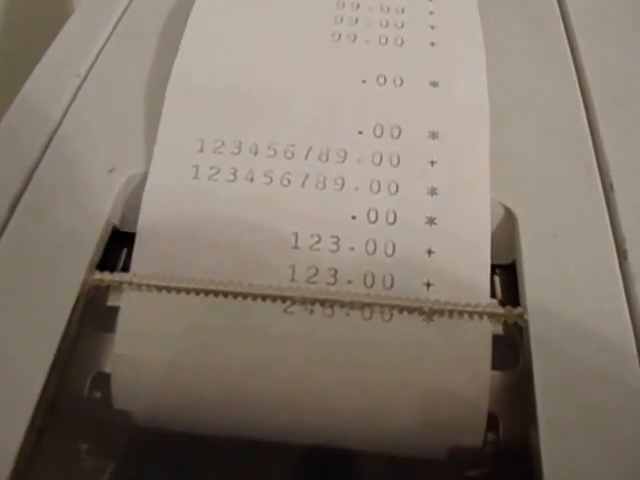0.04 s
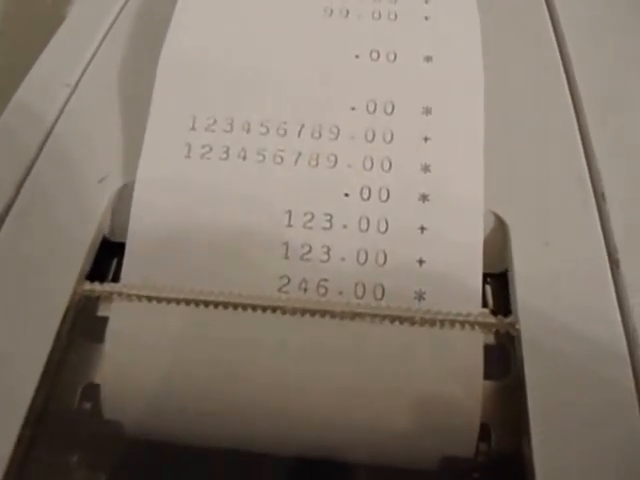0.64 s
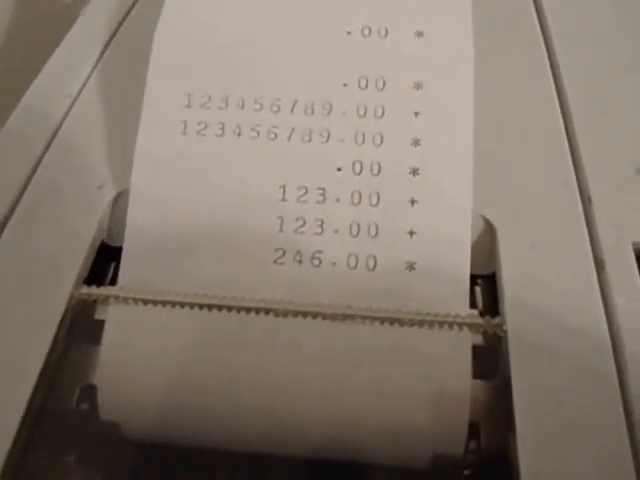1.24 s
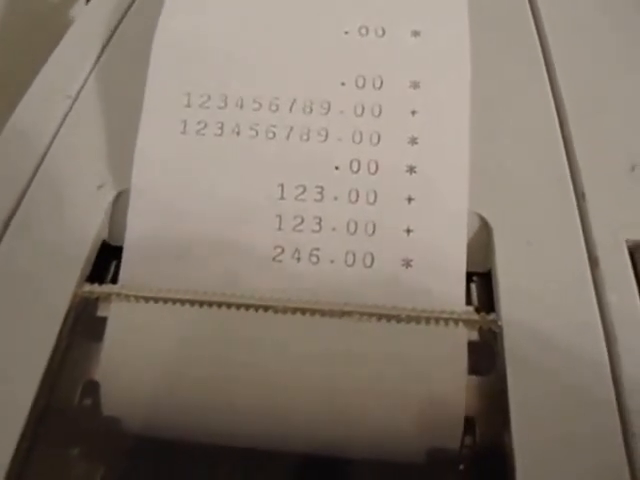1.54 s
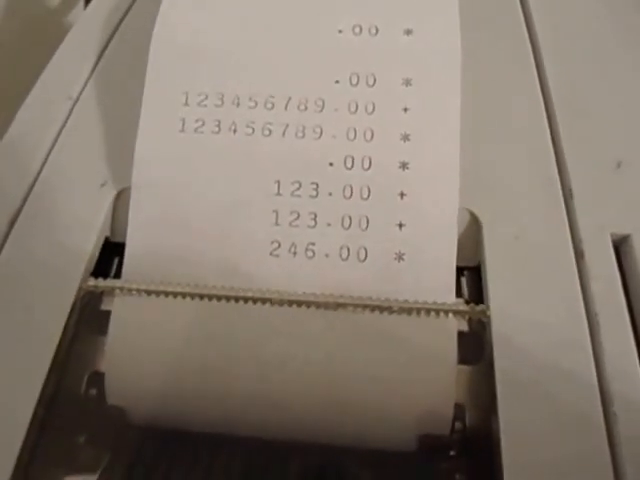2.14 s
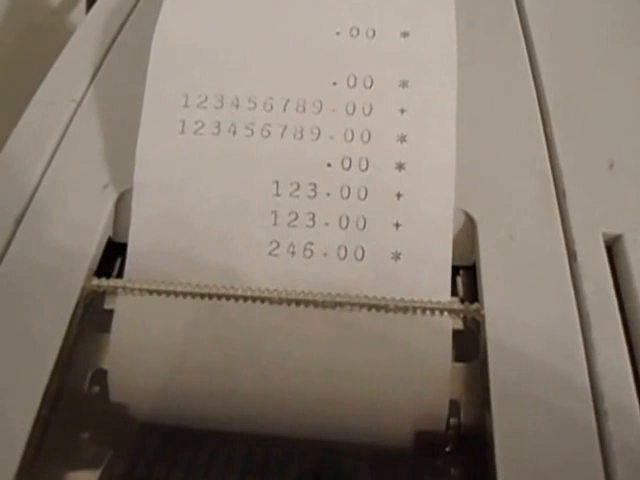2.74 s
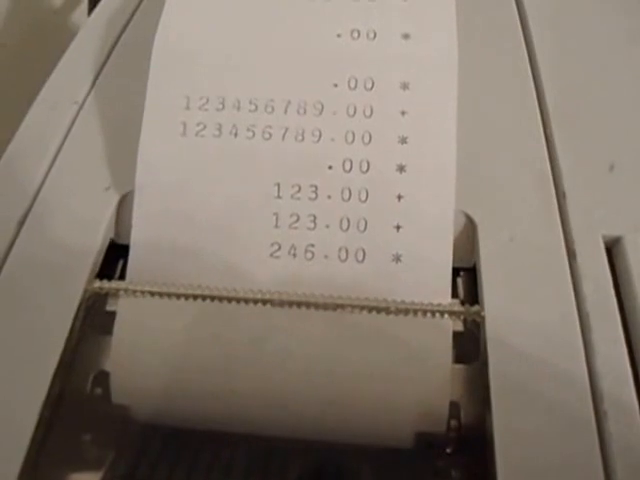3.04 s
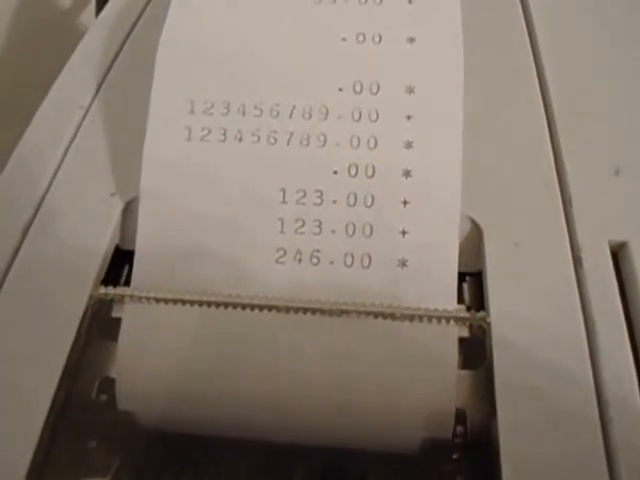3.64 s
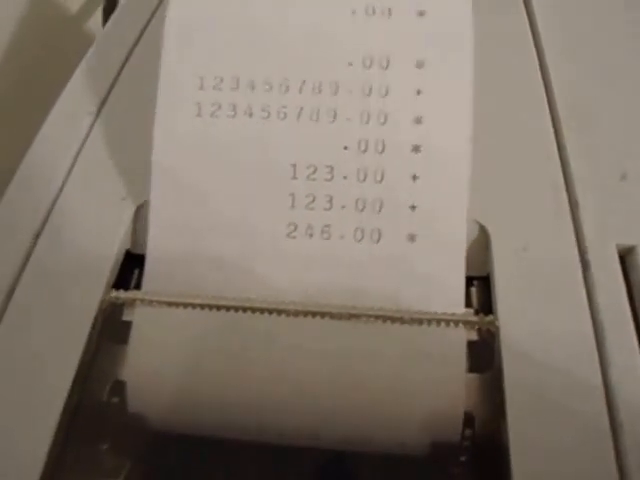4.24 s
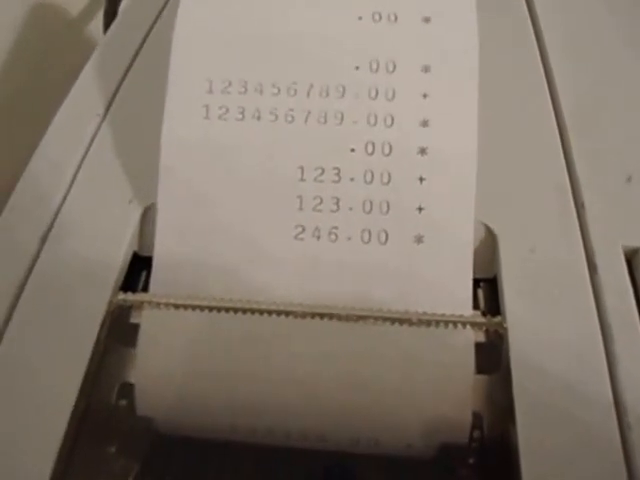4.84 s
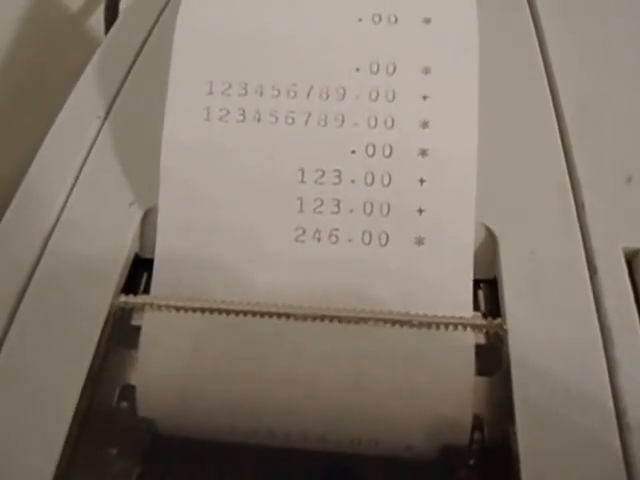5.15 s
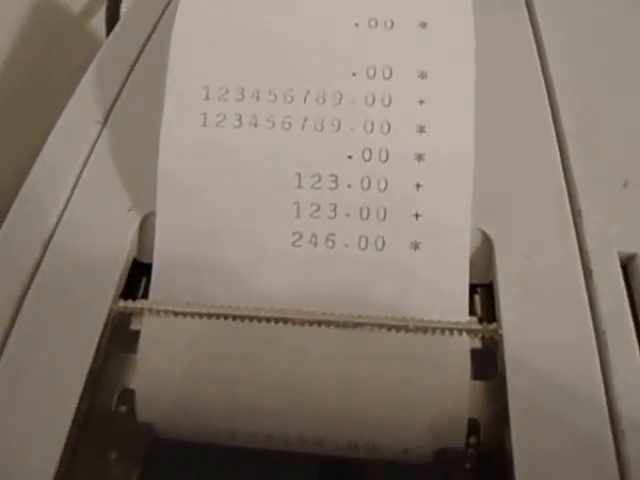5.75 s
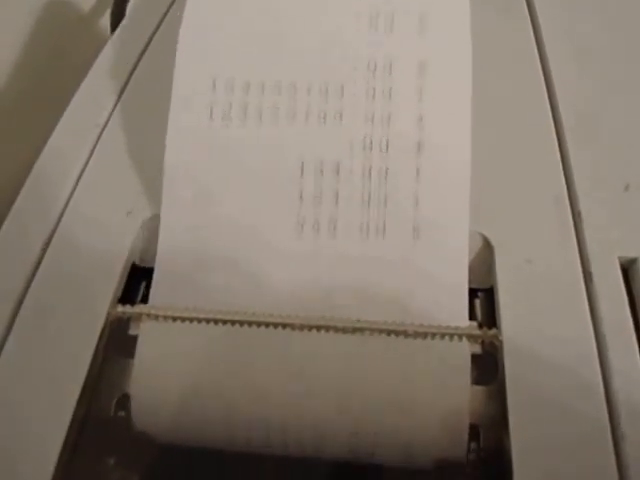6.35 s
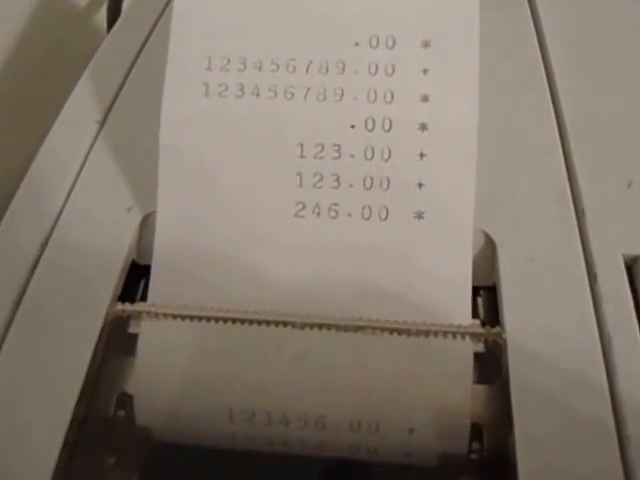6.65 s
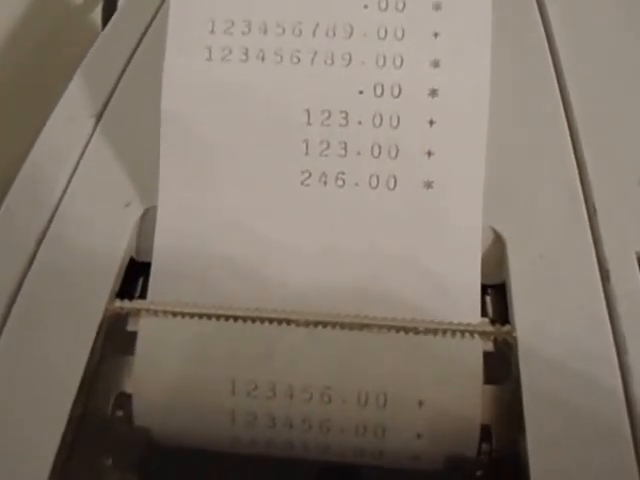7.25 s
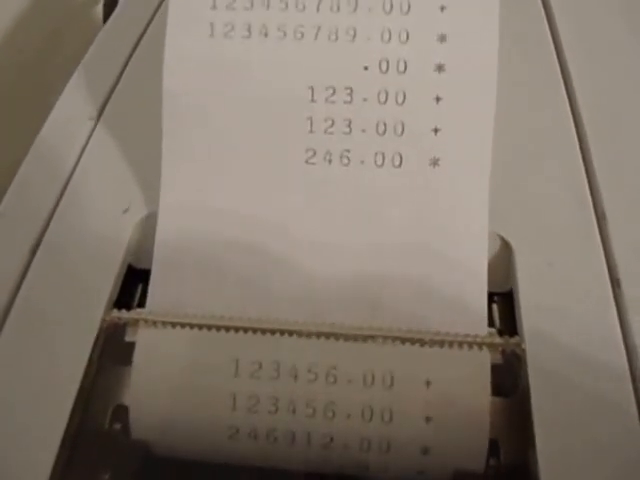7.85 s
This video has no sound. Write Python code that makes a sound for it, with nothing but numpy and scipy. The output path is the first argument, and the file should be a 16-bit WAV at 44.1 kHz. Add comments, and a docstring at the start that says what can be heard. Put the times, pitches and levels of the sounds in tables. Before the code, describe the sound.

An electric adding machine clicks as digits are typed, with clacks and short rattling print bursts over a low motor hum.

```python
"""Electric adding machine on a desk

The machine hums in a small room, heard from close above its paper roll. Digit keys click down
and spring back. A function bar clacks, and the print motor whines through short cycles of
rattling levers, some with a sharp metal slap as the carriage returns.
The hardest blows clip with a brief, bright snap."""
import sys
import numpy as np
from scipy import signal
from scipy.fft import rfft, irfft, next_fast_len
from scipy.io import wavfile

SR = 44100
rng = np.random.default_rng(int(sys.argv[2]) if len(sys.argv) > 2 else 0)


def store_wav(level_fs):
    """Save 16-bit WAV to argv[1]."""
    pcm = np.round(np.clip(np.atleast_2d(level_fs), -1, 1) * 32767)
    wavfile.write(sys.argv[1], SR, pcm.T.astype(np.int16))


N = 353241
TIME = np.arange(N) / SR
AGE = np.arange(6144) / SR   # seconds since a blow
MIC_TOP_HZ = 6170

# how the works and case ring after a key blow or a print blow: (frequency [Hz], relative level [dB])
KEY_BODY = [(80, -16.5), (200, 1.5), (340, -2.5), (540, -7), (800, 2), (1500, -2.5), (2900, 1.5),
            (3700, -8.5), (5000, -12), (7000, -27.5)]
PRINT_BODY = [(60, -3), (170, -4.5), (340, 0.5), (600, -3), (800, -2), (1300, -0.5), (2100, 1),
              (3100, -3.5), (3900, -7), (5000, -15), (7000, -32)]
# print cycles: (start [s], motor gain [dB], lever gain [dB])
CYCLES = [(-.101, 2, 1.5), (.586, 2, 2), (3.862, 0.5, -0.5), (6.051, -1.5, -3), (6.5, -3, -4),
          (7.409, -4.5, -5)]


def digit_keys():
    """Six keys are typed in order, twice; each has its own click going down and coming up."""
    # keystrokes: (down time [s], up time [s], down level [dB], up level [dB])
    strokes = [(2.4128, 2.4963, -19, -22.5), (2.6248, 2.7096, -21.5, -21.5), (2.8174, 2.9146, -20.5, -22),
               (3.1295, 3.2178, -22.5, -23.5), (3.3385, 3.4326, -25, -25), (3.5487, 3.6439, -19.5, -20),
               (4.1722, 4.252, -21.5, -20), (4.3884, 4.4793, -23.5, -24), (4.5982, 4.6816, -22.5, -24),
               (4.8423, 4.9325, -21.5, -26), (5.0451, 5.1331, -31.5, -26), (5.2441, 5.333, -20.5, -26)]
    # each key's voice, down and up: (bass [dB], treble [dB], pitch of the struck part [Hz])
    down_voices = [(1, 3.5, 1470), (-5.5, -14, 1690), (-7, -5, 2154), (-0.5, -4, 1640), (2.5, 1.5, 2500),
                   (-15.5, -5, 1850)]
    up_voices = [(-8, -6.5, 1100), (3.5, -13, 3700), (-11.5, -13, 1880), (8.5, 2.5, 1180), (9.5, 0, 1600),
                 (-3, -16.5, 2450)]
    # tones a key rings with, down and up: (pitch [Hz], relative level [dB], ring time [s])
    press_modes = [(250, -22.5, .09), (335.2, -16.5, 0.11), (908, -17.5, 0.0095), (1300, -6, 0.011),
                   (1648, -9.5, 0.011), (2094, -11, 0.017), (2670, -17.5, 0.011), (3035, -3, 0.018),
                   (3800, -14, 0.014), (4930, -13.5, 0.0063)]
    release_modes = [(352.5, -15, 0.14), (487, -12, 0.1), (758, -1.5, 0.075), (885, -14.5, 0.018),
                     (1165, -8.5, 0.063), (1646, -7.5, 0.066), (2200, -8.5, 0.014), (2830, 1, 0.028),
                     (3700, -16.5, 0.03), (4850, -24, 0.019)]
    downs, ups = [], []
    for k, (down_s, up_s, down_db, up_db) in enumerate(strokes):
        key = k % len(down_voices)
        downs.append((down_s, down_db, *down_voices[key]))
        ups.append((up_s, up_db, *up_voices[key]))
    presses = blows(downs, press_modes, KEY_BODY, gain_db=5, body_db=-4.5, body_t60=.067,
                    part_db=-3.5, part_t60=.016, crack_db=-9, crack_t60=.017)
    releases = blows(ups, release_modes, KEY_BODY, gain_db=0, body_db=-5.5, body_t60=.081,
                     part_db=1.5, part_t60=.04, crack_db=-8.5, crack_t60=.0079)
    rubbing = scrapes(downs, gain_db=-34, lead_s=.0085, t60=.21)
    return presses + releases + rubbing + key_returns(ups) + key_springs(ups)


def key_returns(ups, tick_db=-42, tick_lead_s=.027, slide_db=-45, slide_lead_s=.0026, knock_hz=770):
    """As the finger lifts, a key ticks, slides up and knocks once more as it settles."""
    out = np.zeros(N)
    for s, level_db, *_ in ups:
        tick = shelves(body_ring(KEY_BODY, t60=.033), bass_db=-3, treble_db=-.5)
        add(out, s - tick_lead_s + .0027 * rng.standard_normal(), from_db(tick_db) * tick)
        add(out, s - slide_lead_s, from_db(slide_db) * body_ring(KEY_BODY, t60=.067))
        pitch = knock_hz * (1 + .04 * rng.standard_normal())
        knock = np.sin(2 * np.pi * pitch * AGE) * dying(AGE, t60=.03)
        add(out, s + .0077, from_db(level_db - 2) * knock)   # just after the click, and softer
    return out


def key_springs(ups, shared_hz=804, shared_db=-51):
    """A rising key sets its own spring singing, and feeds a lower one that all the keys share."""
    # each key's return spring: (pitch [Hz], level [dB])
    springs = [(3100, -66.5), (3040, -55), (2410, -51.5), (3310, -55.5), (3330, -61.5), (3040, -61.5)]
    own, shared_level, age = np.zeros(N), np.zeros(N), TIME[:SR]
    for k, (s, *_) in enumerate(ups):
        hz, db = springs[k % len(springs)]
        add(own, s, from_db(db) * np.sin(2 * np.pi * hz * age) * dying(age, t60=.93))
        add(shared_level, s, from_db(shared_db) * dying(age, t60=1.5))
    return own + shared_level * np.sin(2 * np.pi * shared_hz * TIME)


def function_bar():
    """The bar rubs in its guide and clacks hard, shaking the print works; the clack at 6.05 s is the bar
    springing back up after the one at 5.96 s."""
    # its blows: (time [s], level [dB], bass [dB], treble [dB], pitch of the struck part [Hz])
    hits = [(0.5184, -23.5, -5, -6, 1093), (3.7869, -7.5, -3, -6.5, 1266), (5.9647, -8.5, -8.5, -15, 1648),
            (6.0533, -17.5, -7, -2, 1637), (6.3882, -11, 5.5, 3.5, 1530), (7.3376, -16.5, -6.5, -2.5, 1635)]
    # tones it rings with: (pitch [Hz], relative level [dB], ring time [s])
    modes = [(94, -24.5, 0.11), (164, -18, 0.2), (324.3, -16, 0.11), (515, -16.5, 0.044),
             (750, -9.5, 0.072), (1236, -4, 0.052), (1552, -1.5, 0.023), (2220, -9, 0.012),
             (3132, -3, 0.0029), (3730, -11.5, 0.026), (4940, -23, 0.036)]
    clacks = blows(hits, modes, PRINT_BODY, gain_db=-1, body_db=1, body_t60=.06,
                   part_db=-2, part_t60=.032, crack_db=0, crack_t60=.0033)
    return clacks + scrapes(hits, gain_db=-29, lead_s=.004, t60=.081)


def late_slaps():
    """A sharp metal slap late in some print cycles, as the carriage returns."""
    # the slaps: (time [s], level [dB], bass [dB], treble [dB], pitch of the struck part [Hz])
    hits = [(4.1625, -15.5, -3, -14, 1242), (6.352, -17.5, 11, 26, 1290.0), (6.8, -17.5, 4, 7.5, 1269),
            (7.7078, -23, -4.5, -0.5, 1250)]
    # tones they ring with: (pitch [Hz], relative level [dB], ring time [s])
    modes = [(310, -18.5, 0.12), (472, -2, 0.035), (920, -3, 0.032), (1253, 2.5, 0.036), (2006, -25, 0.085),
             (2500, -26, 0.02), (2960, -17, 0.012), (4630, -3.5, 0.014), (5610, -7.5, 0.022)]
    return blows(hits, modes, PRINT_BODY, gain_db=2.5, body_db=-5.5, body_t60=.042,
                 part_db=2.5, part_t60=.016, crack_db=-12.5, crack_t60=.018)


def levers(gain_db=-1, tick_db=3, scatter_db=1.3, slop_s=.001, bounce_s=.007, bounce_db=-4.5):
    """Cams trip the same steel levers each cycle; each lands twice, ticking and rattling the frame."""
    # lever drops: (time into the cycle [s], level [dB], treble [dB])
    drops = [(.001, -28.5, -7.5), (0.016, -23, 4), (.051, -34.5, 2.5), (.062, -28, -6), (.115, -26.5, -2),
             (0.127, -33.5, -2.5), (.138, -35.5, -9.5), (.155, -40, 14), (0.188, -43, 19), (.218, -45, 1),
             (.31, -30.5, 0), (0.334, -28.5, -11), (.347, -26, -11.5), (.361, -23, 1.5), (.375, -24, -10.5),
             (.44, -54, 13)]
    out = np.zeros(N)
    for start, _, cycle_db in CYCLES:
        for after, level_db, treble_db in drops:
            s = start + after + slop_s * rng.standard_normal()
            db = gain_db + cycle_db + level_db + scatter_db * rng.standard_normal()
            bounce_lag = bounce_s * (.5 + rng.random())
            for lag, loss_db in ((0, 0), (bounce_lag, bounce_db)):
                if s > 0:
                    add(out, s + lag, from_db(db + loss_db) * lever_hit(tick_db, treble_db))
    return out


def lever_hit(tick_db, treble_db):
    """One landing of a lever: a bright tick and a short rattle of the frame."""
    # how the frame rings: (frequency [Hz], relative level [dB])
    frame = [(80, -2.5), (220, -3), (350, 3.5), (500, 8), (630, 0), (800, 2.5), (1250, 3.5), (2000, -7),
             (3100, -5.5), (3900, -7), (4900, -6.5), (7000, -24.5)]
    tick = shelves(body_ring(frame, t60=.018, rise_s=.0002), bass_db=-12, treble_db=1)
    hit = from_db(tick_db) * tick + body_ring(frame, t60=.074)
    return attack_one(shelves(hit, bass_db=0, treble_db=treble_db))


def print_motor(loaded_hz=80.4, sag=.08, wobble=.00746, cycle_s=.38, take_up_s=.035, coast_s=.022):
    """The motor whines, slowing as it takes the load, and its gears chatter in step with it."""
    # tones of the whine: (multiple of the turning rate, level [dB])
    whine_tones = [(3, -48.5), (4, -39.5), (5, -54.5), (6, -46), (7, -56.5), (9, -52.5), (10, -47),
                   (11, -57.5), (12, -50.5), (14, -56.5), (16, -53), (19, -56.5), (21, -54.5), (22, -61),
                   (24, -49.5)]
    # noise of the gears: (frequency [Hz], relative level [dB])
    gears = [(100, -17), (250, -5), (350, -4), (480, -14), (620, -10.5), (850, -13), (1300, -8),
             (1700, -19.5), (2000, -6.5), (2400, -19), (3000, -14), (3500, -22.5), (4800, -19), (7000, -36)]
    load, level = np.zeros(N), np.zeros(N)
    for start, db, _ in CYCLES:
        rise = 1 - np.exp(-np.maximum(TIME - start, 0) / take_up_s)
        fall = np.exp(-np.maximum(TIME - start - cycle_s, 0) / coast_s)
        load += rise * fall
        level += rise * fall * from_db(db)
    speed = loaded_hz * (1 + sag * (1 - load) + wobble * drift(18))
    angle = 2 * np.pi * np.cumsum(speed) / SR
    whine = np.zeros(N)
    for multiple, db in whine_tones:
        strength = np.sqrt(2) * from_db(db + 2 * drift(25))
        whine += strength * np.sin(round(multiple) * angle + 2 * np.pi * rng.random())
    ticking = rng.random(N) < 900 / SR   # about 900 tooth ticks a second
    teeth = ticking * rng.standard_normal(N) * from_db(4 * drift(120))
    chatter = coloured(rms_one(teeth) + rng.standard_normal(N), gears)
    chatter *= 1 + .25 * np.sin(angle)   # swells once a turn
    return level * (whine + from_db(-41) * chatter)


def idle_hum(tones_db=43, waver_db=.45, wander=.003):
    """Slightly unsteady motor and mains tones over a dull rush of air."""
    # tones of the hum: (pitch [Hz], relative level [dB])
    hum_tones = [(38.6, -46), (59.3, -49.5), (77.3, -55), (117.5, -54.5), (154.6, -43), (193.3, -56.5),
                 (231.5, -55.5), (268.5, -52.5), (349.9, -52), (387.6, -70.5), (484.5, -58.5),
                 (619.1, -65.5)]
    # rush of air: (frequency [Hz], relative level [dB])
    air_spectrum = [(18, -18.5), (40, -15.5), (62, -11), (90, -16.5), (130, -7), (200, -11), (340, -14),
                    (500, -19.5), (750, -20.5), (1050, -27.5), (1310, -23.5), (1480, -32.5), (4400, -42),
                    (7000, -58.5)]
    # loudness of hum and air together: (time [s], gain [dB])
    loudness = [(0.0, -44), (1.56, -44), (1.78, -43.5), (5.53, -45.5), (7.06, -50.5), (8.0, -51)]
    unsteady_time = TIME + np.cumsum(wander * drift(2.5)) / SR
    tones = np.zeros(N)
    for hz, db in hum_tones:
        strength = np.sqrt(2) * from_db(db + waver_db * drift(6))
        tones += strength * np.sin(2 * np.pi * (hz * unsteady_time + rng.random()))
    air = coloured(rng.standard_normal(N), air_spectrum)
    level = from_db(np.interp(TIME, *np.transpose(loudness)))
    return level * (from_db(tones_db) * tones + air)


def room(x, echo_db=-17, t60=.25, build_up_s=.0035):
    """A small room answers with a soft, short echo."""
    # tone colour of the echo: (frequency [Hz], relative level [dB])
    spectrum = [(100, 1.5), (350, 11.5), (800, 2), (2000, -6.5), (3100, -1), (7000, -12)]
    age = TIME[:SR // 2]
    envelope = dying(age, t60) * (1 - np.exp(-age / build_up_s))
    echo = coloured(rng.standard_normal(len(age)), spectrum) * envelope
    echo = signal.sosfilt(signal.butter(2, MIC_TOP_HZ, fs=SR, output="sos"), echo)
    echo *= np.sqrt(2 * MIC_TOP_HZ / SR / np.sum(echo ** 2))   # gain near 1 in the microphone's range
    return x + from_db(echo_db) * signal.fftconvolve(x, echo)[:N]


def blows(hits, modes, body, gain_db, body_db, body_t60, part_db, part_t60, crack_db, crack_t60,
          detune=.025, scatter_db=2.5, contact_s=.00026):
    """A blow is a crack, ringing tones and the works behind; each lands in a new spot, so tones vary."""
    out = np.zeros(N)
    for s, level_db, bass_db, treble_db, part_hz in hits:
        all_modes = list(modes) + [(part_hz, part_db, part_t60)]
        hz, db, t60 = np.array(all_modes).T[:, :, None]
        hz = hz * (1 + detune * rng.standard_normal(hz.shape))
        strength = from_db(db + scatter_db * rng.standard_normal(db.shape))
        phase = 2 * np.pi * rng.random(db.shape)
        ring = np.sum(strength * np.sin(2 * np.pi * hz * AGE + phase) * dying(AGE, t60), axis=0)
        ring = attack_one(ring * (1 - np.exp(-AGE / contact_s)))
        crack = from_db(crack_db) * body_ring(body, crack_t60, rise_s=contact_s)
        works = from_db(body_db) * body_ring(body, body_t60)
        blow = shelves(crack + ring + works, bass_db, treble_db)
        add(out, s, from_db(level_db + gain_db) * attack_one(blow))
    return out


def scrapes(hits, gain_db, lead_s, t60):
    """A key or bar rubs in its guide just before each of its blows."""
    out = np.zeros(N)
    for s, *_ in hits:
        rub = shelves(body_ring(KEY_BODY, t60), bass_db=-3, treble_db=-8)
        add(out, s - lead_s, from_db(gain_db) * rub)
    return out


def body_ring(spectrum, t60, rise_s=.001):
    """Countless close tones of the works blur into noise that swells at once and dies."""
    noise = coloured(rng.standard_normal(len(AGE)), spectrum)
    return attack_one(noise * dying(AGE, t60) * (1 - np.exp(-AGE / rise_s)))


def from_db(db):
    """Turn decibels into a gain."""
    return 10 ** (np.asarray(db) / 20)


def rms_one(x):
    """Scale to an average (rms) level of 1."""
    return x / np.sqrt(np.mean(x ** 2) + 1e-20)


def attack_one(x):
    """Scale a blow to an average (rms) level of 1 over its first 12 ms."""
    return x / np.sqrt(np.mean(x[:529] ** 2) + 1e-20)


def dying(age, t60):
    """Fade by 60 dB in t60 seconds, the ring time."""
    return np.exp(-np.log(1000) * age / t60)


def coloured(x, spectrum):
    """Shape a noise to a spectrum of (frequency [Hz], relative level [dB])."""
    hz, db = np.transpose(spectrum)
    size = next_fast_len(len(x))
    bin_hz = np.maximum(np.arange(size // 2 + 1) * SR / size, 1)
    gain = from_db(np.interp(np.log(bin_hz), np.log(hz), db))
    return rms_one(irfft(rfft(x, size) * gain, size)[:len(x)])


def drift(turns_per_s):
    """A random wander, roughly between -1 and 1."""
    points = rng.standard_normal(4096)
    return np.interp(TIME * turns_per_s, np.arange(len(points)), points)


def add(track, s, sound):
    """Mix a sound into a track at s seconds."""
    start = max(round(s * SR), 0)
    track[start:start + len(sound)] += sound[:max(N - start, 0)]


def shelves(x, bass_db, treble_db, bass_hz=850, treble_hz=2600):
    """Turn the bass and the treble up or down."""
    x = x + (from_db(bass_db) - 1) * low_pass(x, bass_hz)
    return x + (from_db(treble_db) - 1) * (x - low_pass(x, treble_hz))


def low_pass(x, hz):
    """Gently soften everything above hz."""
    k = np.tan(np.pi * hz / SR)
    return signal.lfilter([k, k], [1 + k, k - 1], x)


def scene():
    """Keys and print works echo in the room, over the hum."""
    machine = digit_keys() + function_bar() + late_slaps() + levers() + print_motor()
    return (room(machine) + idle_hum())[None]


def record(dry, notch_hz=5527, notch_q=11, notch_db=-18, stop_hz=8200, cutoff_hz=16000):
    """The microphone rounds peaks, dips near the top of its range and loses the high treble."""
    rounded = 2.5 * np.tanh(dry / 2.5)
    notched = signal.lfilter(*signal.iirnotch(notch_hz, notch_q, fs=SR), rounded)
    heard = notched + from_db(notch_db) * (rounded - notched)
    heard = signal.sosfilt(signal.butter(16, MIC_TOP_HZ, fs=SR, output="sos"), heard)
    heard = signal.sosfilt(signal.cheby2(12, 60, stop_hz, fs=SR, output="sos"), heard)
    clipped = np.clip(heard, -1, 1)   # the hardest blows get a brief, bright snap
    return signal.sosfilt(signal.cheby1(12, .5, cutoff_hz, fs=SR, output="sos"), clipped)


dry = scene()
out = record(dry)
store_wav(out)
```